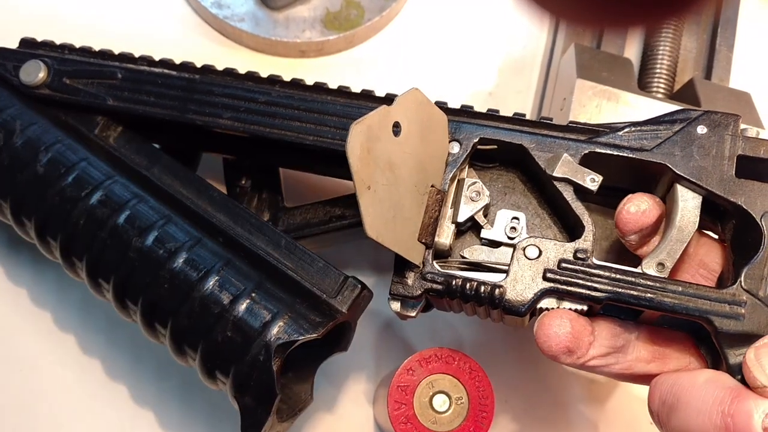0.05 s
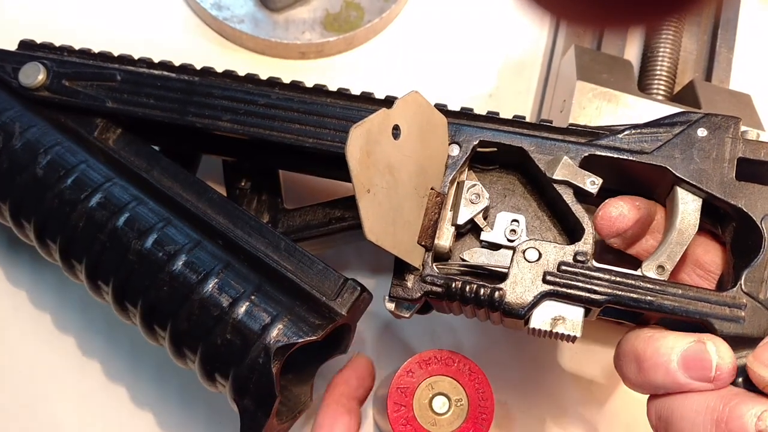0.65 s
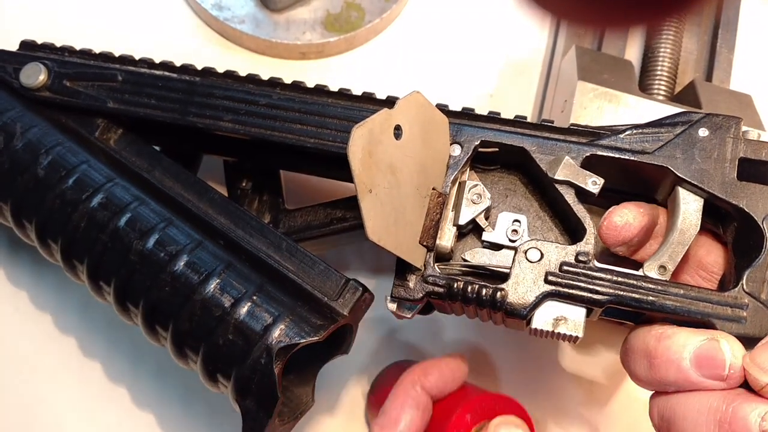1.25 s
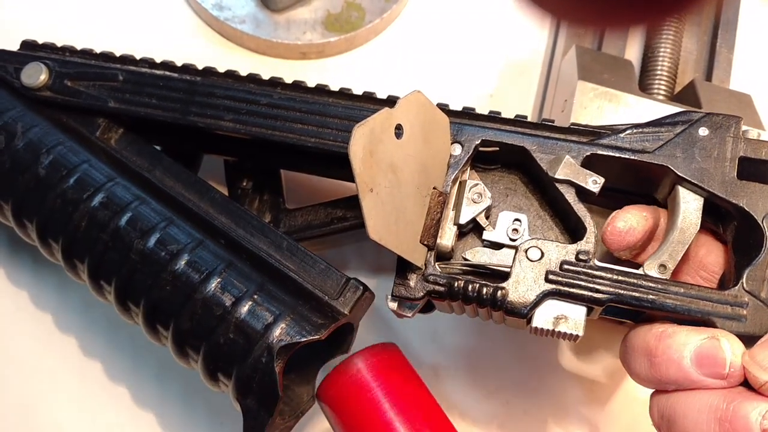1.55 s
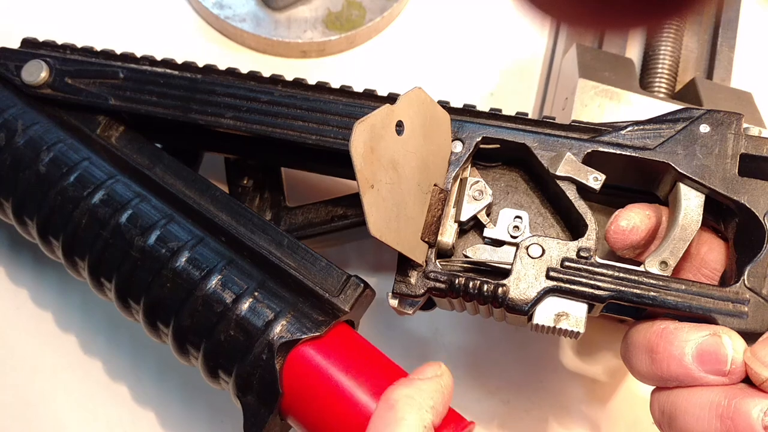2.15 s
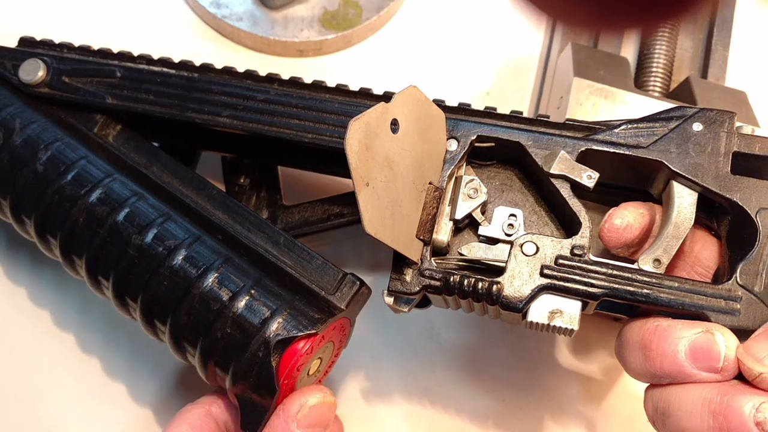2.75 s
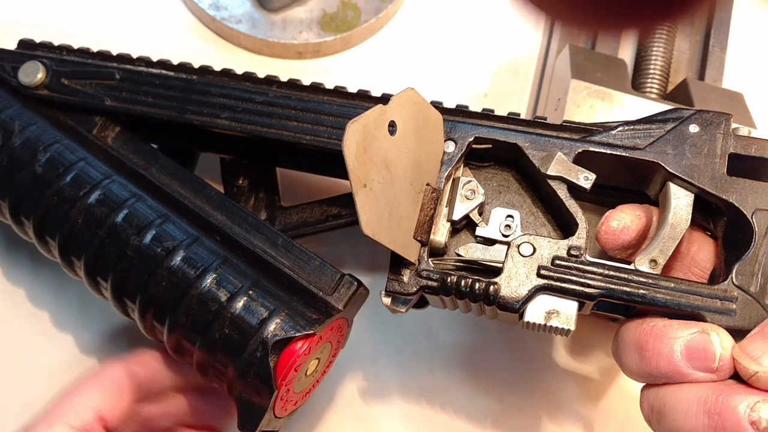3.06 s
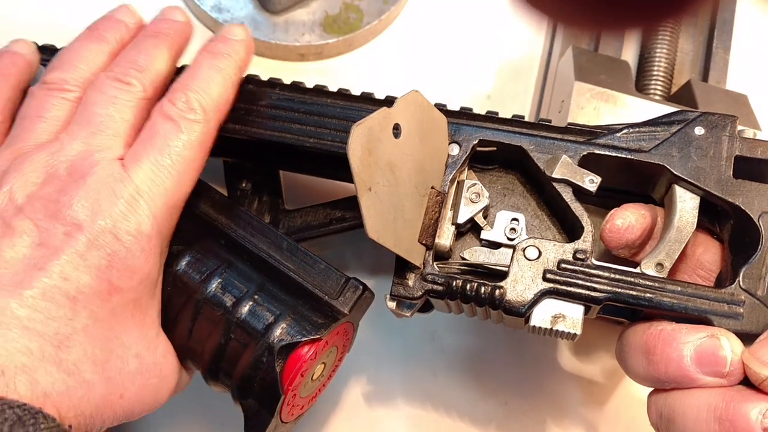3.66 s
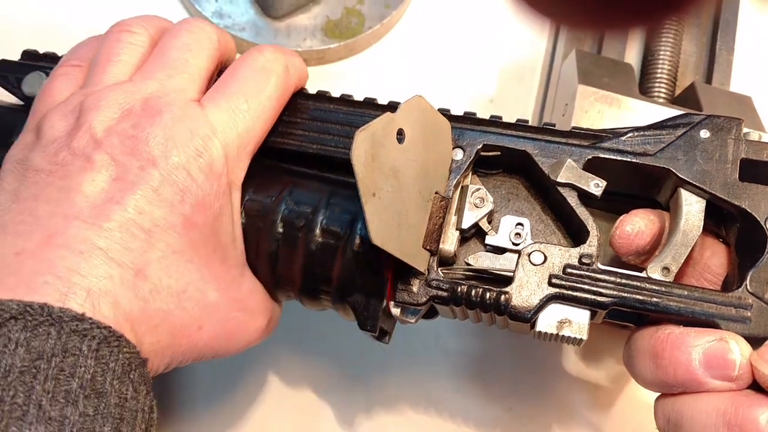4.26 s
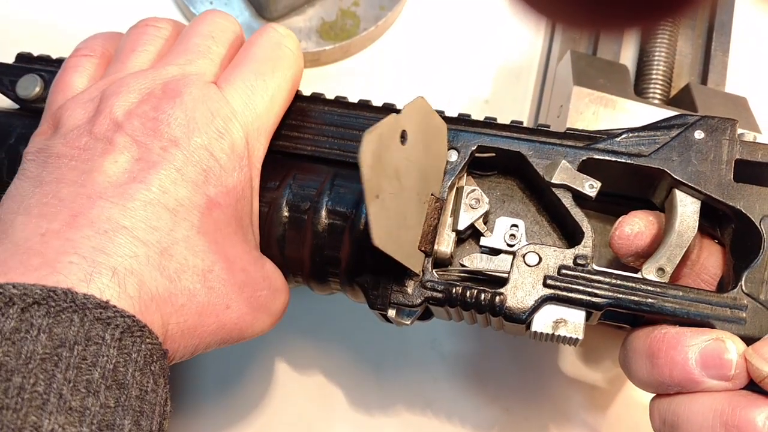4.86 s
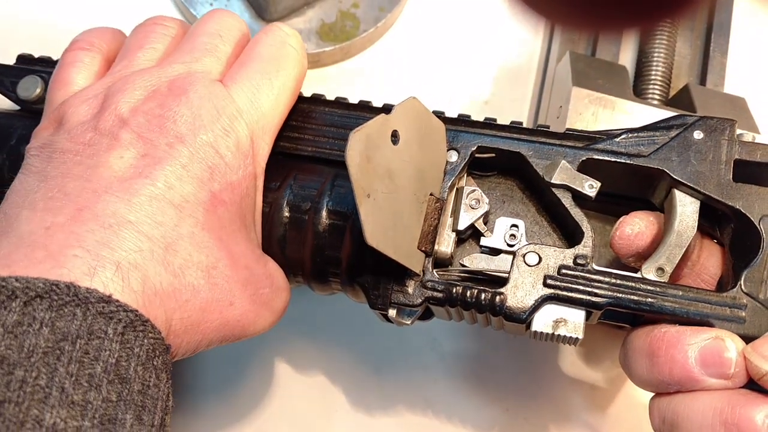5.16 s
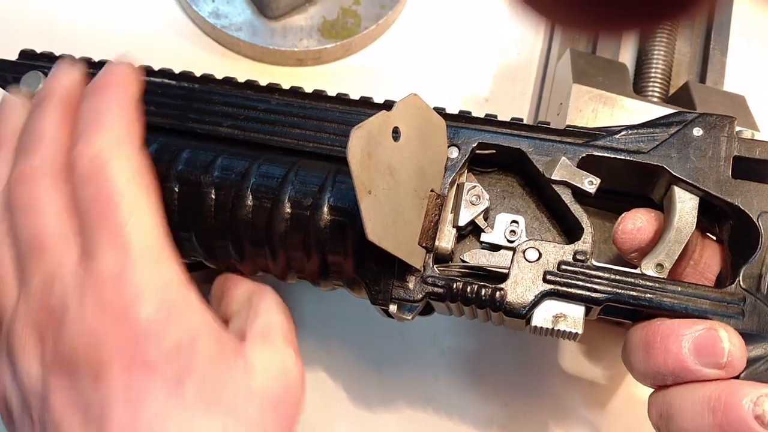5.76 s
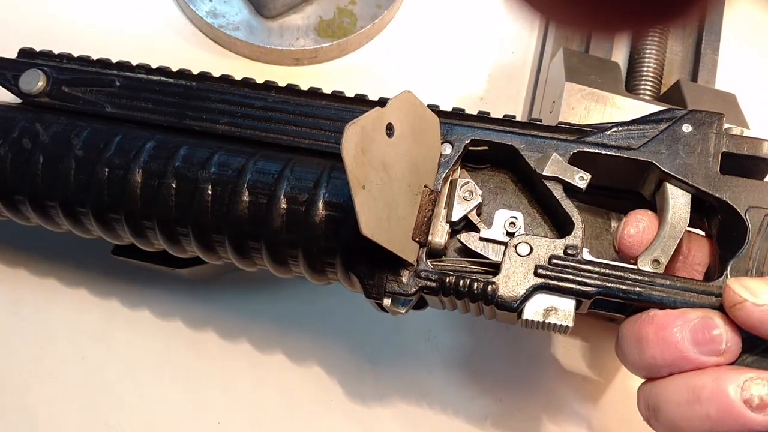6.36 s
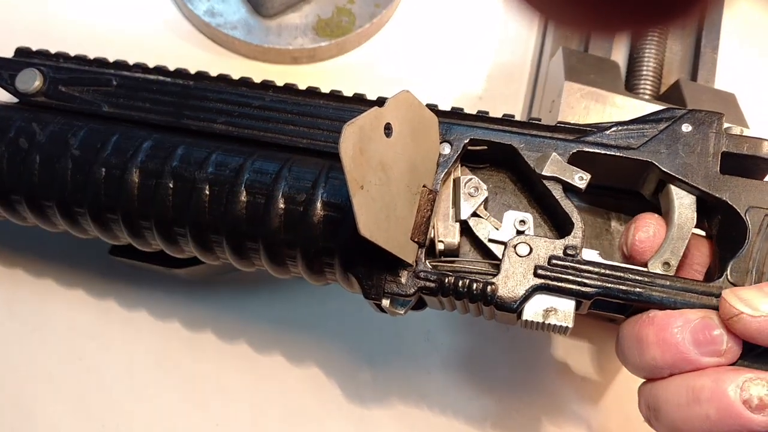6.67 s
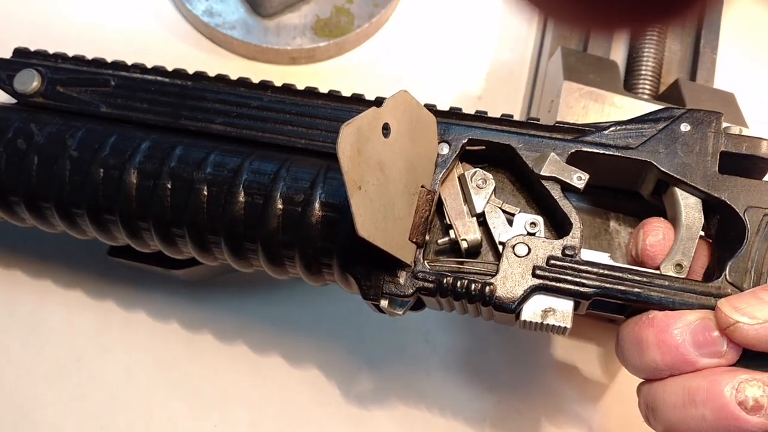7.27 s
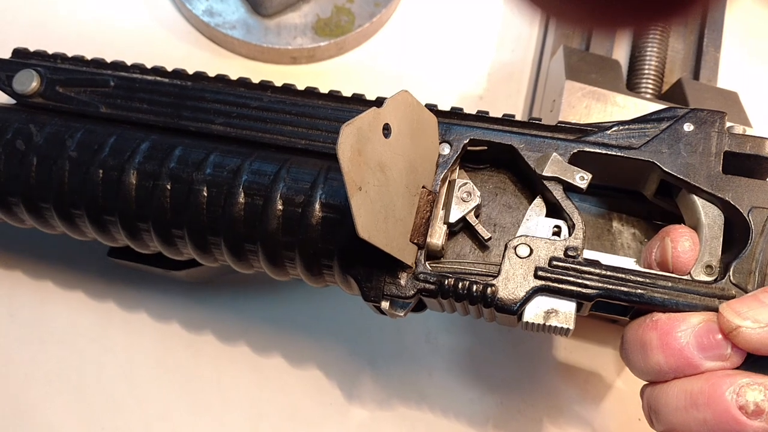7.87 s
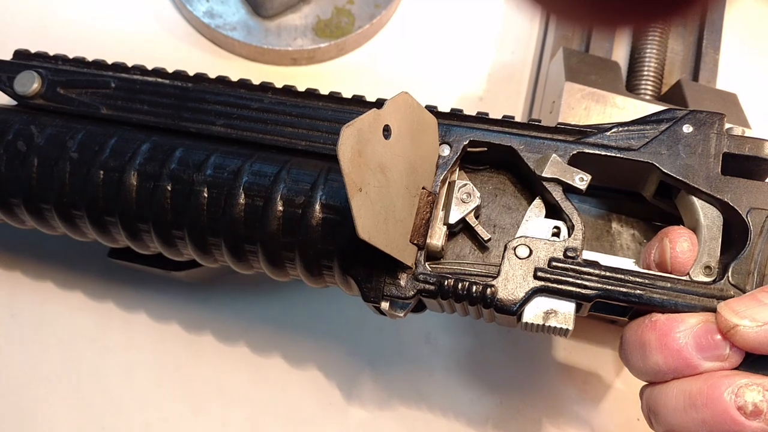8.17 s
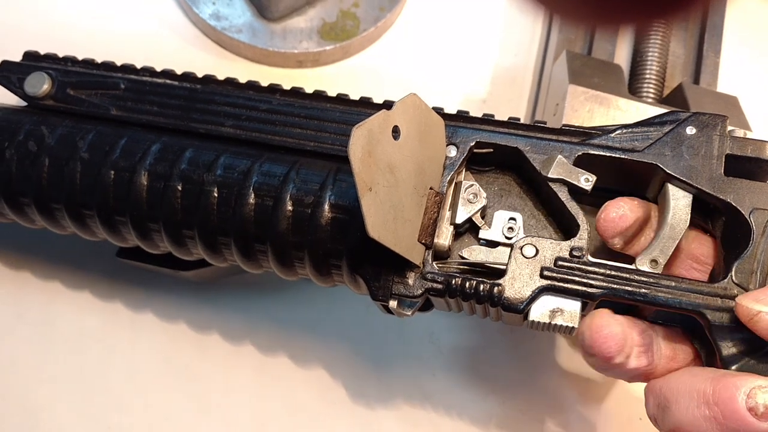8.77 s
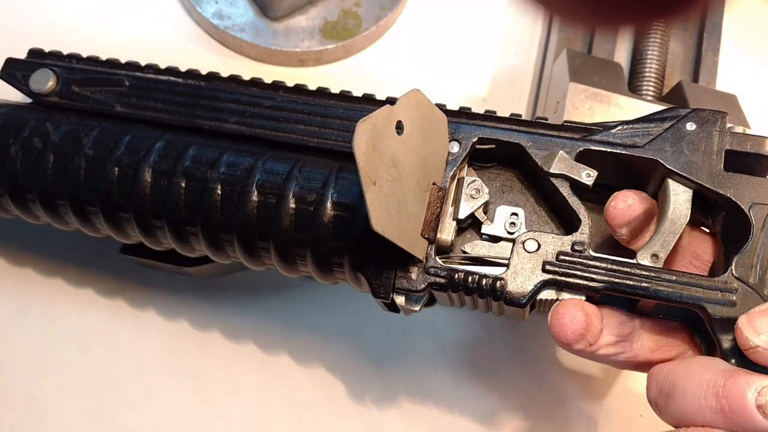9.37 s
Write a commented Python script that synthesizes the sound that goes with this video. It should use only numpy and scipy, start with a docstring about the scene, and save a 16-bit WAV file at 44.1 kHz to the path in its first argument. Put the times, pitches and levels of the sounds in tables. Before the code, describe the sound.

Close to the microphone in a small, softly hissing room, a launcher is loaded and worked by hand. Hollow taps lead to a short plastic scrape ending in a firm knock, followed by the dull thud of the barrel shutting and a crisp latch clack. The mechanism clicks, then the striker snaps loudly, its spring singing faintly as the trigger returns with a bright click.

```python
"""A break-open launcher is worked by hand on a bench, close up in a small room, over a soft hiss.
A hollow shell taps the tube (1.6 s), catches its rim and scrapes home (2.5 s). The barrel swings shut
with a thud (4.3 s) and the latch snaps in (4.8 s). The trigger is drawn, a pawl clicking, until the
striker flies with a loud snap (7.5 s) and its spring sings on. The trigger springs back (8.6 s).
Gain control ducks the hiss after each hard blow."""
import sys
import numpy as np
from scipy import signal
from scipy.fft import rfft, irfft, next_fast_len
from scipy.io import wavfile
from scipy.ndimage import uniform_filter1d

SR = 44100
rng = np.random.default_rng(int(sys.argv[2]) if len(sys.argv) > 2 else 0)


def wav_out(sig):
    """Save sig, one row per channel (or a flat mono array), as 16-bit PCM at SR to the path in sys.argv[1]."""
    wavfile.write(sys.argv[1], SR, np.round(np.clip(np.atleast_2d(sig).T, -1, 1) * 32767).astype(np.int16))


N = 419818
TOP_HZ = 15350


def amp(db):
    """Decibels to gain."""
    return 10 ** (np.asarray(db) / 20)


def unit_rms(x):
    """Scales to rms 1."""
    return x / np.sqrt(np.mean(x ** 2) + 1e-20)


def curve_at(points, hz):
    """Reads a curve on a log-frequency axis."""
    freqs, values = np.transpose(points)
    return np.interp(np.log(hz + 1), np.log(freqs + 1), values)


def add(mix, s, sound):
    """Lays a sound into the mix at s seconds."""
    part = mix[..., round(s * SR):][..., :sound.shape[-1]]
    part += sound[..., :part.shape[-1]]


def equalise(x, eq):
    """Shapes a signal with an EQ curve of (Hz, dB) points."""
    n = x.shape[-1]
    size = next_fast_len(n + SR // 4)
    gain = amp(curve_at(eq, np.fft.rfftfreq(size, 1 / SR)))
    return irfft(rfft(x, size) * gain, size)[..., :n]


def band(x, edges_hz, order=3):
    """Causal band-pass."""
    return signal.sosfilt(signal.butter(order, edges_hz, "bandpass", fs=SR, output="sos"), x)


def resonate(x, hz, width_hz):
    """A resonance that follows hz, applied twice for steep skirts; comes out at rms 1."""
    carrier = np.exp(2j * np.pi * np.cumsum(hz * np.ones(len(x))) / SR)
    pole = np.exp(-np.pi * width_hz / SR)
    baseband = signal.lfilter([(1 - pole) ** 2], [1, -2 * pole, pole * pole], x / carrier)
    return unit_rms((carrier * baseband).real)


def drift(per_s):
    """A random wobble of rms 1."""
    knots = rng.standard_normal(2000)
    return unit_rms(np.interp(np.arange(N) / SR * per_s, np.arange(len(knots)), knots))


def decay(t, t60):
    """Dies away by 60 dB in t60 seconds."""
    return np.exp(-np.log(1000) * t / t60)


def swell(middle_s, length_s):
    """A smooth rise and fall around a moment."""
    return np.cos(np.pi * np.clip((np.arange(N) / SR - middle_s) / length_s, -.5, .5)) ** 2


def diffuse(size):
    """White noise arriving from all sides, partly alike left and right."""
    # Stereo likeness. Each row: frequency in Hz, correlation (capped at 1 below).
    likeness = [(50, 1.2), (400, 0.95), (1500, 1.13), (5000, 1.34), (9000, 0.5), (15000, 0.8)]
    n = next_fast_len(size)
    left, other = rfft(rng.standard_normal((2, n)))
    same = np.clip(curve_at(likeness, np.fft.rfftfreq(n, 1 / SR)), 0, 1)
    right = same * left + np.sqrt(1 - same ** 2) * other
    return irfft(np.array([left, right]), n)[:, :size]


def background(wash_db=-58, hiss_db=-57):
    """A bed of air noise: a low wash and a hiss, each wavering a little."""
    # Tone of the air. Each row: frequency in Hz, level in dB.
    air_eq = [(25, -7), (60, 2), (130, 0), (350, -5), (800, -9.5), (1400, -11), (2200, -19), (2900, -4.5),
              (3500, -9), (4300, -7), (7500, -14.5), (9500, -12.5), (12500, -14), (15000, -20)]
    air = equalise(diffuse(N), air_eq)
    wash = amp(wash_db + 1.1 * drift(per_s=14)) * unit_rms(band(air, [25, 1800]))
    hiss = amp(hiss_db + .47 * drift(per_s=15)) * unit_rms(band(air, [1800, 17000]))
    return wash + hiss


def reverb_tail(decay_times):
    """One second of diffuse reverb, each frequency dying at its own rate."""
    hz, t, spectra = signal.stft(diffuse(SR), SR, nperseg=256)
    fade = decay(t, curve_at(decay_times, hz)[:, None])
    tail = signal.istft(spectra * fade, SR, nperseg=256)[1][:, :SR]
    return tail / np.linalg.norm(tail[0])


def room(direct, send, bench_db=-15, bench_delays_s=(.0031, .0033), build_s=.014):
    """The direct sound, a bounce off the bench to each side, and the small room behind."""
    # Reverb time. Each row: frequency in Hz, t60 in seconds.
    decay_times = [(60, 0.21), (200, 0.44), (500, .43), (1500, .41), (4000, 0.63), (8000, .32),
                   (11000, 0.24), (14000, 0.27)]
    # Tone of the reverb return. Each row: frequency in Hz, gain in dB.
    return_eq = [(60, -8.5), (170, -2.5), (280, -3), (420, -11), (800, -15), (2000, -17), (6000, -17),
                 (14000, -24)]
    t = np.arange(SR) / SR
    response = equalise(reverb_tail(decay_times), return_eq) * (1 - np.exp(-t / build_s))
    bounce = np.array([np.pad(direct, (round(s * SR), 0))[:N] for s in bench_delays_s])
    reverb = signal.fftconvolve(send[None], response, axes=1)[:, :N]
    return direct + amp(bench_db) * bounce + reverb


def fingers(slips_per_s=55, spread_db=1.86, resting_db=-67):
    """Skin sticks and slips on the frame in small dull ticks, louder when the grip shifts."""
    # Grip shifts. Each row: middle in seconds, length in seconds, level in dB.
    grips = [(1.248, .4, -69), (3.95, .5, -65.5), (6.12, .3, -62), (6.9, .3, -62), (8.25, .5, -73.5),
             (9.194, .3, -60.5)]
    slipping = rng.random(N) < slips_per_s / SR
    slips = slipping * amp(spread_db * np.minimum(rng.exponential(1, N), 3))
    t = np.arange(SR // 20) / SR
    tick = band(rng.standard_normal(len(t)) * decay(t, .053), [300, 950], order=2)
    pressure = amp(resting_db) + sum(amp(db) * swell(s, length) for s, length, db in grips)
    return pressure * unit_rms(signal.oaconvolve(slips, tick)[:N])


def hand_brushes():
    """Skin swishes lightly over metal and rumbles where the palm presses."""
    # Hand strokes. Each row: middle and length in seconds, level in dB, low and high edge in Hz.
    strokes = [(0.45, 0.21, -51, 2480, 14000), (3.512, 0.98, -60, 2520, 12000),
               (3.923, 0.51, -53.5, 50, 400), (6.65, .14, -54, 60.4, 300)]
    return sum(amp(db) * swell(s, length) * unit_rms(band(rng.standard_normal(N), edges, order=2))
               for s, length, db, *edges in strokes)


def ringing(modes, t):
    """A struck part rings as decaying sines of alternating polarity."""
    return sum((-1) ** k * amp(db) * decay(t, t60) * np.sin(2 * np.pi * hz * t)
               for k, (hz, db, t60) in enumerate(modes))


def strike(hits, modes, bands_db, chatter_t60, send_db, dense_db=-8, rise_s=.0004, glancing=.4):
    """Each hit cracks, chatters and rings its part and the frame; gives direct sound and reverb send."""
    # Thud, knock, clack and tick, balanced by bands_db. Each row: low and high edge in Hz.
    hit_bands = [(115, 600), (600, 2200), (2200, 6500), (6500, 12300)]
    # Thump of the frame clamped to the bench. Each row: pitch in Hz, level in dB, t60 in seconds.
    frame_modes = [(81, -28.5, 0.16), (140, -29.5, 0.055), (223, -28, 0.27), (314, -22.5, 0.038),
                   (497, -18.5, .08)]
    out, t = np.zeros(N), np.arange(SR // 4) / SR
    ring = ringing(modes, t) + ringing(frame_modes, t)
    crack = amp(2) * decay(t, .0076)
    chatter = amp(-3) * decay(t, chatter_t60)  # loose faces
    dense = amp(dense_db) * decay(t, .14)  # many weak modes between the strong ones
    hardest_db = max(row[1] for row in hits)
    for s, level_db, tilt_db in hits:
        # The hardest hit lands square; weaker ones glance and build more slowly.
        attack_s = rise_s * amp(glancing * (hardest_db - level_db))
        noise = (crack + chatter + dense) * rng.standard_normal(len(t))
        hit = (ring + noise) * (1 - np.exp(-t / attack_s)) ** 2
        for k, (edges, band_db) in enumerate(zip(hit_bands, bands_db)):
            layer = band(hit, edges)
            layer *= np.sqrt(SR / 100) / np.linalg.norm(layer)  # the energy of 10 ms at rms 1
            add(out, s, amp(level_db + band_db + tilt_db * (k - 1)) * layer)
    return np.array([out, amp(send_db) * out])


def shell_taps():
    """The hollow shell is picked up and bounces against the tube."""
    # Taps. Each row: start in seconds, level in dB, treble tilt in dB per band.
    taps = [(1.318, -66.5, 10), (1.5645, -25, 1), (1.5805, -25, -2.5), (1.594, -31.5, 0)]
    # The shell's ring. Each row: pitch in Hz, level in dB, t60 in seconds.
    modes = [(1311, -4.5, 0.089), (1356, -3, 0.037), (1472, -10, 0.13), (1640, -11.5, 0.12),
             (1750, -10, 0.034), (1959, -5, 0.15), (3280, 1.5, 0.047), (3400, -1.5, 0.042),
             (3520, -2.5, 0.028), (4270, -3, .04), (5310, -3, 0.048), (6360, -12, 0.065), (6870, -4, .04),
             (7360, -6, 0.037)]
    return strike(taps, modes, bands_db=(-12.5, 2.5, -2, -11), chatter_t60=.024, send_db=5.5)


def rim_catches():
    """The shell's rim catches in the mouth of the tube."""
    # Catches. Each row: start in seconds, level in dB, treble tilt in dB per band.
    catches = [(1.838, -40, -3.5), (1.9, -39, 3.5), (1.91, -33, -3), (1.934, -40.5, -2)]
    # The rim's ring. Each row: pitch in Hz, level in dB, t60 in seconds.
    modes = [(466, -11.5, 0.099), (552, -6, 0.104), (1473, -1, 0.078), (1573, -7, 0.25), (1655, -2, 0.11),
             (1970, -8, 0.12), (2046, -7.5, 0.13), (2120, -14, 0.1)]
    return strike(catches, modes, bands_db=(-2.5, 1.5, -5.5, -19), chatter_t60=.065, send_db=1)


def tube_bumps():
    """The tube is bumped and booms."""
    # Bumps. Each row: start in seconds, level in dB, treble tilt in dB per band.
    bumps = [(2.419, -28, 0), (2.431, -32.5, -2), (4.798, -43, -6)]
    # The tube's boom. Each row: pitch in Hz, level in dB, t60 in seconds.
    modes = [(258, -11.5, 0.11), (384.7, 6, 0.23), (480, 0, 0.06), (589, -11.5, 0.08), (1933, -21, 0.1),
             (2220, -21, 0.08), (3800, -16, 0.065), (3900, -17, 0.11)]
    return strike(bumps, modes, bands_db=(3.5, -1.5, -8, -16.5), chatter_t60=.06, send_db=-1.5)


def shell_slide(start_s=1.9, tightest_s=2.419, end_s=2.55, attack_s=.081, release_s=.013,
                bind_db_per_s=140, free_db_per_s=330, rough_db=2.5):
    """Plastic rubs along the bore: the tube hums, the air gap glides, the scrape grows as it binds."""
    # Air resonance of the gap around the shell. Each row: time in seconds, pitch in Hz.
    gap_glide = [(1.95, 810), (2.1, 1080), (2.24, 1020), (2.31, 834), (2.37, 560), (2.42, 385)]
    t = np.arange(N) / SR
    gap_hz = np.interp(t, *np.transpose(gap_glide))
    moving = np.clip(np.minimum((t - start_s) / attack_s, (end_s - t) / release_s), 0, 1)
    binding = amp(-np.maximum(bind_db_per_s * (tightest_s - t), free_db_per_s * (t - tightest_s)))
    friction = rng.standard_normal((4, N)) * amp(rough_db * drift(per_s=97))
    tube_rub, gap_rub, hard_rub, wall_rub = friction
    hum = amp(-50) * resonate(tube_rub, hz=372, width_hz=70)
    gap = amp(-54) * resonate(gap_rub, gap_hz, width_hz=150)
    # Only the hardest rubbing squeaks and rasps.
    squeak = amp(-41) * binding * resonate(hard_rub, 2650 + 1.6 * gap_hz, width_hz=260)
    rasp = amp(-46) * binding * resonate(hard_rub, 950 + 1.1 * gap_hz, width_hz=420)
    # Tone of the scrape. Each row: frequency in Hz, level in dB.
    scrape_eq = [(100, -9.5), (350, -4), (800, -10.5), (1500, -2.5), (2500, -11), (3700, -4.5), (6000, -8),
                 (9000, -11), (15000, -20.5)]
    scrape = (amp(-52) + amp(-42) * binding) * unit_rms(equalise(wall_rub, scrape_eq))
    return moving * (hum + gap + scrape + squeak + rasp)


def breech_knocks():
    """The breech is knocked, hardest as the shell seats."""
    # Knocks. Each row: start in seconds, level in dB, treble tilt in dB per band.
    knocks = [(0.322, -47.5, 1), (2.5382, -32, -1.5), (2.543, -14.5, -0.5), (3.2258, -48, 10)]
    # The breech's ring. Each row: pitch in Hz, level in dB, t60 in seconds.
    modes = [(374, -21.5, 0.27), (607, -14, 0.021), (840, -11.5, 0.16), (1114, -2.5, 0.11),
             (1535, 9.5, 0.019), (1760, -7.5, 0.04), (1920, -17, 0.22), (1998, -6.5, 0.066),
             (2150, -17.5, 0.074), (2130, -13.5, 0.034), (2700, -4.5, 0.025), (2925, -4.5, 0.035),
             (3260, -17, 0.023), (3620, -5.5, 0.028), (4425.0, -23.5, 0.025), (6030, -25, 0.043)]
    return strike(knocks, modes, bands_db=(-9.5, -2.5, -11, -23), chatter_t60=.01,
                  send_db=-.5, dense_db=-11.5)


def guide_grazes():
    """The swinging barrel grazes its guide."""
    # Grazes. Each row: start in seconds, level in dB, treble tilt in dB per band.
    grazes = [(4.165, -49, -12.5), (4.178, -38, -1), (4.195, -37, -1)]
    # The guide's thin ring. Each row: pitch in Hz, level in dB, t60 in seconds.
    modes = [(1680, -3.5, 0.025), (1928, -2, 0.06), (2670, -4, 0.06), (3680, -4, 0.031),
             (6094.0, -7, 0.025), (7600, -3, 0.025), (10952.0, -2, 0.025)]
    return strike(grazes, modes, bands_db=(-28, 0, -2, -9.5), chatter_t60=.019, send_db=7.5)


def barrel_thuds():
    """The barrel thuds against its stop."""
    # Thuds. Each row: start in seconds, level in dB, treble tilt in dB per band.
    thuds = [(4.269, -20.5, 0.5), (4.302, -47, -10), (4.312, -34, -4.5), (4.778, -49, 5), (6.61, -48.5, -9),
             (6.631, -51, -9)]
    # The stop's dull ring. Each row: pitch in Hz, level in dB, t60 in seconds.
    modes = [(311, -12.5, 0.075), (400.6, -8.5, 0.088), (468.0, -17.5, 0.087), (600, -14.5, 0.04),
             (828, -15.5, 0.13), (1120, -7.5, 0.039), (1485, -17.5, 0.047), (1564, 0.5, 0.039),
             (1654, -8, 0.068), (1849.0, -21, 0.1), (1941.0, -21.5, 0.036), (2680, -3, 0.025)]
    return strike(thuds, modes, bands_db=(-4, -.5, -15.5, -34), chatter_t60=.016, send_db=-4.5)


def latch_snaps():
    """The latch rides over its catch, snaps in and settles."""
    # Snaps. Each row: start in seconds, level in dB, treble tilt in dB per band.
    snaps = [(4.828, -23, -1), (4.8355, -15, -3), (4.841, -15, 4.5), (4.8515, -23, 4.5), (4.991, -43, -2)]
    # The latch's ring. Each row: pitch in Hz, level in dB, t60 in seconds.
    modes = [(505, -20, 0.037), (995, -4.5, 0.014), (1140, -16, 0.091), (1385, -12, 0.06),
             (1540, -0.5, 0.017), (1605, -14.5, 0.059), (1710, -7, 0.043), (3090, -22.5, 0.11),
             (3950, -15, 0.028), (5140, -20.5, 0.062), (5394.0, -32.5, 0.021), (5780, -12, 0.021),
             (7170, -9.5, 0.036), (7540, -9.5, 0.035), (9400, -8.5, 0.033), (9540, -4.5, 0.045)]
    return strike(snaps, modes, bands_db=(-11, -.5, -7.5, -18), chatter_t60=.02,
                  send_db=-4.5, dense_db=-11)


def pawl_clicks():
    """The pawl drops from notch to notch."""
    # Clicks. Each row: start in seconds, level in dB, treble tilt in dB per band.
    clicks = [(6.2547, -21.5, 0.5), (6.5965, -42, -1), (7.507, -44.5, -1.5), (8.509, -48, -7),
              (8.577, -43, -3)]
    # The pawl's ring. Each row: pitch in Hz, level in dB, t60 in seconds.
    modes = [(1010, -19, 0.069), (1120, 0, 0.069), (1440, -3, 0.034), (1677.0, 0, 0.025),
             (2050, -8.5, 0.04), (2240, -15, 0.019), (2444.0, -17, 0.025), (2892, -6.5, 0.02477),
             (3370.0, -16.5, 0.025), (4788.0, -22.5, 0.021), (5324.0, -21, 0.022), (6500, -17, 0.023),
             (6960, -12.5, 0.027), (7030, -24, 0.025)]
    return strike(clicks, modes, bands_db=(-10, 1.5, -7, -20.5), chatter_t60=.009,
                  send_db=-4.5, dense_db=-17.5)


def trigger_clicks():
    """The trigger takes up, lets the striker go and springs back."""
    # Clicks. Each row: start in seconds, level in dB, treble tilt in dB per band.
    clicks = [(6.571, -61, -9), (6.5765, -43, -3.5), (7.515, -33, -3), (7.5205, -36, -3),
              (7.5229, -20.5, 1.5), (8.4925, -48.5, -2.5), (8.604, -42.5, -4.5), (8.61, -35, 1.5),
              (8.6135, -22.5, 0.5), (8.63, -42, -11.5)]
    # The trigger's bright ring. Each row: pitch in Hz, level in dB, t60 in seconds.
    modes = [(410, -8, 0.12), (2660, -12, 0.023), (5580, -5.5, 0.023), (6080, -3, 0.016),
             (6500, -9.5, .025), (6930, -1, .022), (7500, -13.5, .035), (7460, -11.5, 0.021),
             (8260, -4.5, 0.019), (9100, -11, .025), (9400, -4, 0.02), (10170, -5, 0.01),
             (10900, -11, .025)]
    return strike(clicks, modes, bands_db=(-3, .5, 6.5, 5), chatter_t60=.015,
                  send_db=-3.5, dense_db=-13)


def striker_spring(start_s=7.53, hz=496, level_db=-43, t60=2.6):
    """The striker's spring sings faintly on after the blow."""
    out, t = np.zeros(N), np.arange(2 * SR) / SR
    add(out, start_s, amp(level_db) * decay(t, t60) * np.sin(2 * np.pi * hz * t))
    return out


def striker_bang(start_s=7.5298, gain_db=-6, attack_s=.0016, body_hz=2200, bloom_s=.0079):
    """The striker's blow fills the room: strong first reflections, with the low body blooming last."""
    # Tone of the bang. Each row: frequency in Hz, level in dB.
    bang_eq = [(30, -7), (80, -7.5), (160, -8), (280, 0), (500, -0.5), (1050, 0), (1700, 1), (2400, -6.5),
               (3500, -11), (6500, -12), (8000, -16.5), (11000, -22.5), (15000, -28)]
    # How long it hangs in the room. Each row: frequency in Hz, t60 in seconds.
    decay_times = [(60, .4), (200, 1), (500, 0.76), (1500, 0.62), (4000, 0.67), (8000, .55), (11000, 0.3),
                   (14000, .34)]
    out, t = np.zeros((2, N)), np.arange(SR) / SR
    tail = equalise(reverb_tail(decay_times), bang_eq)
    tail /= tail[0, :SR // 20].std()
    body = equalise(tail, [(body_hz, 0), (1.3 * body_hz, -40)])
    bang = (tail - body * np.exp(-t / bloom_s)) * (1 - np.exp(-t / attack_s))
    early_lift = 1 + amp(6) * decay(t, .14)
    add(out, start_s, amp(gain_db) * bang * early_lift)
    return out


def scene():
    """Loading, closing and firing in the room, over the bed of air."""
    loading = shell_taps() + rim_catches() + tube_bumps() + breech_knocks()
    closing = guide_grazes() + barrel_thuds() + latch_snaps()
    firing = pawl_clicks() + trigger_clicks()
    rubbing = shell_slide() + fingers() + hand_brushes()
    direct, send = loading + closing + firing + rubbing
    return room(direct, send) + striker_bang() + striker_spring() + background()


def power_db(pair, window):
    """Running level of a stereo pair over a window of samples."""
    return 10 * np.log10(abs(uniform_filter1d((pair ** 2).mean(0), size=window)) + 1e-12)


def gain_control(pair, threshold_db=-37, slope=.8, range_db=22, start_db=14,
                 fall_db_per_s=62, recover_db_per_s=10):
    """Loud treble ducks the gain, which creeps back; it starts out turned down."""
    t = np.arange(N) / SR
    fall, recovery = fall_db_per_s * t, recover_db_per_s * t
    treble = band(pair, [3600, TOP_HZ], order=2)
    over_db = np.clip(slope * (power_db(treble, window=660) - threshold_db), 0, range_db)
    held_db = np.maximum(np.maximum.accumulate(over_db + recovery), start_db) - recovery
    duck_db = np.minimum.accumulate(held_db - fall) + fall
    return pair / amp(duck_db)


def limiter(pair, ceiling_db=-6, recover_db_per_s=260):
    """Clamps down on the loudest blows and lets go quickly."""
    recovery = np.arange(N) * recover_db_per_s / SR
    held_db = np.maximum.accumulate(power_db(pair, window=300) + recovery) - recovery
    over_db = np.maximum(held_db - ceiling_db, 0)
    return pair / amp(uniform_filter1d(over_db, size=100))


def record(dry, drive=.95):
    """Two microphone ports of opposite polarity, then gain control, limiter, clipping and a high cut."""
    # Stereo balance. Each row: frequency in Hz, left minus right in dB.
    balance = [(60, .2), (250, 1.7), (1000, 0.31), (3000, 0.43), (8000, 2.9), (14000, 2.6)]
    # The right port's lag; long waves go a longer way round. Each row: frequency in Hz, lag in seconds.
    port_lag = [(200, .0006), (600, .00058), (1300, .0004), (2200, .00045), (16000, .00045)]
    size = next_fast_len(N + SR)
    hz = np.fft.rfftfreq(size, 1 / SR)
    lean = amp(curve_at(balance, hz) / 2)
    delay = np.exp(-2j * np.pi * hz * curve_at(port_lag, hz))
    ports = np.array([lean, -delay / lean])
    pair = irfft(rfft(dry, size) * ports, size)[:, :N]
    clipped = np.clip(drive * limiter(gain_control(pair)), -1, 1)
    high_cut = signal.firwin(255, TOP_HZ, window=("kaiser", 8), fs=SR)
    return signal.oaconvolve(clipped, high_cut[None], "same")


dry = scene()
out = record(dry)
wav_out(out)
```